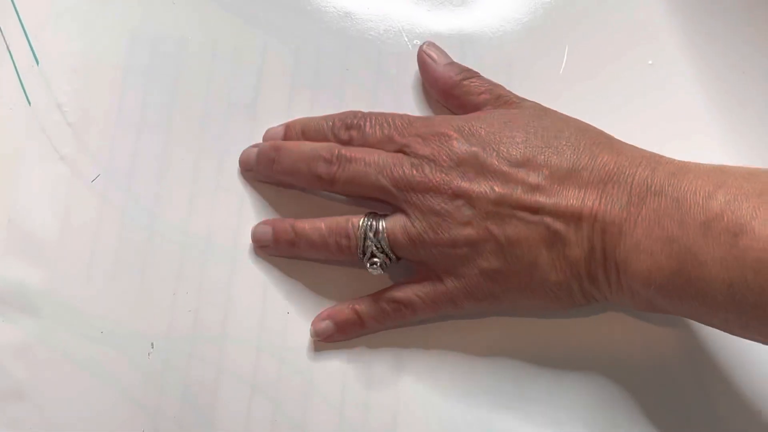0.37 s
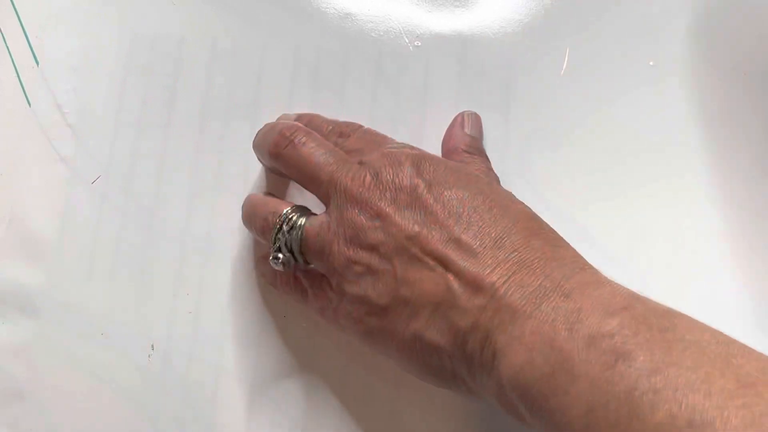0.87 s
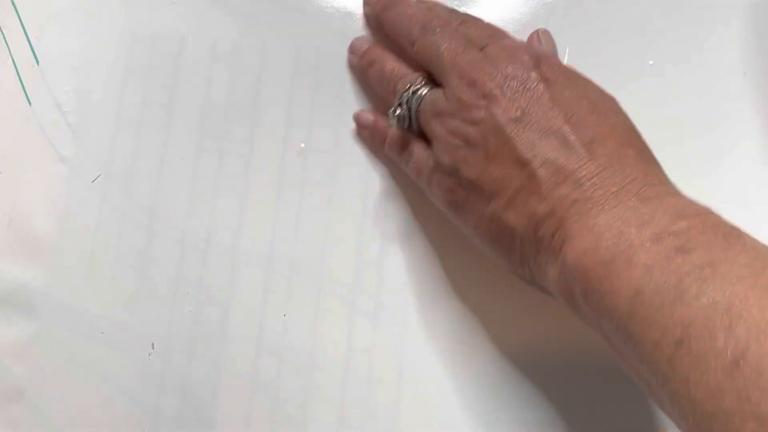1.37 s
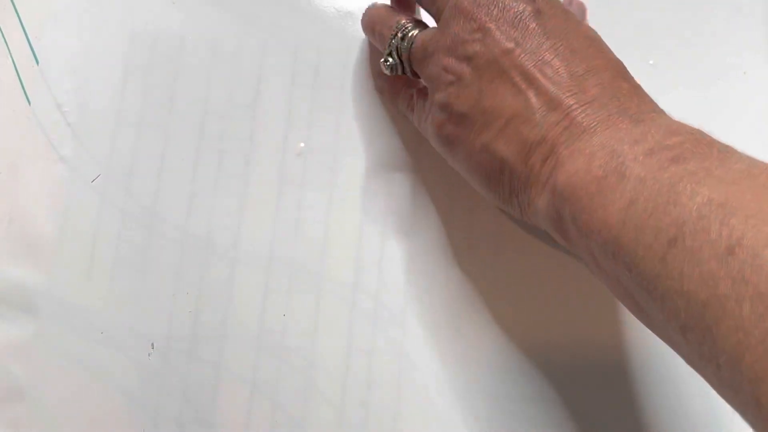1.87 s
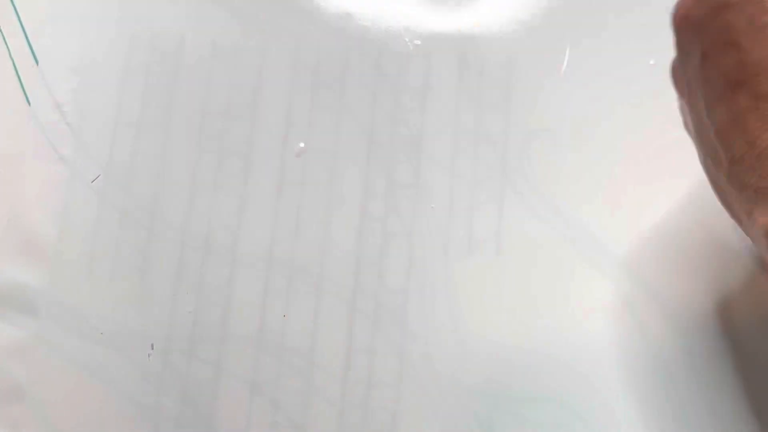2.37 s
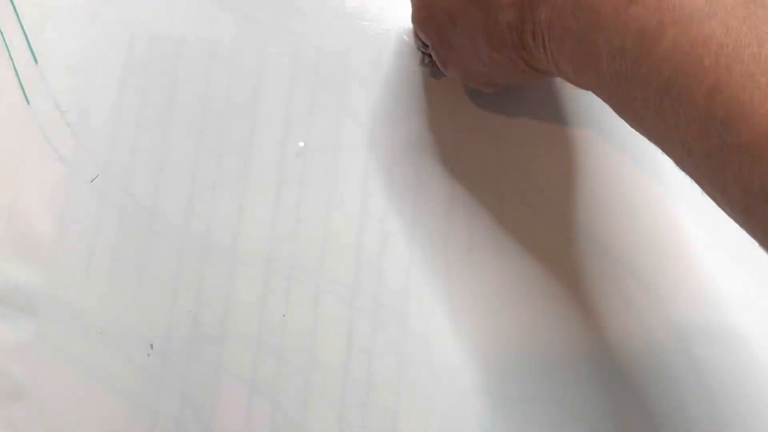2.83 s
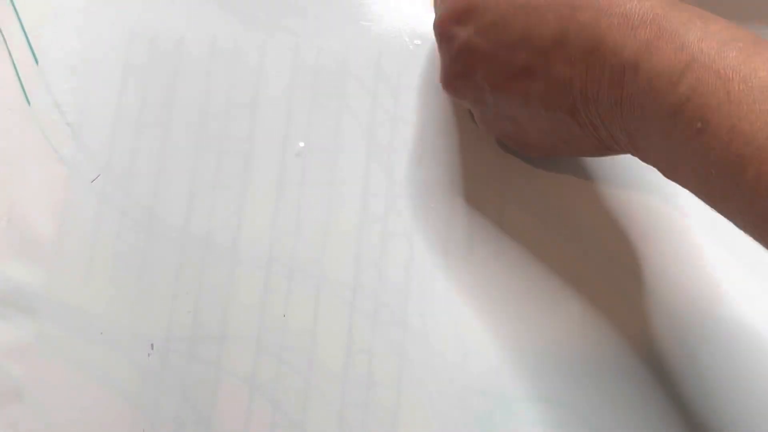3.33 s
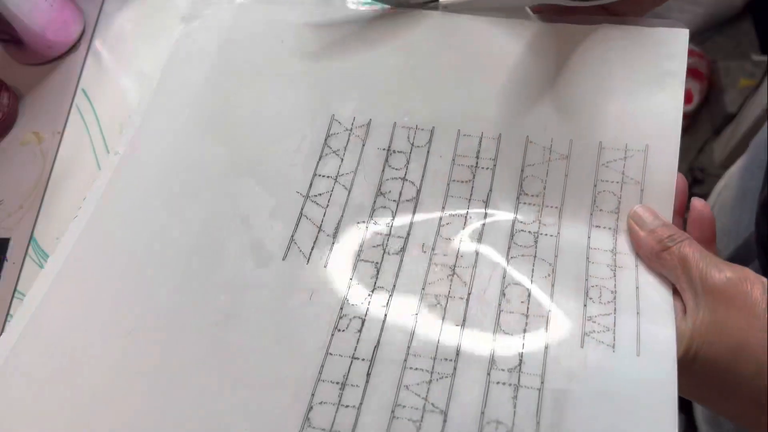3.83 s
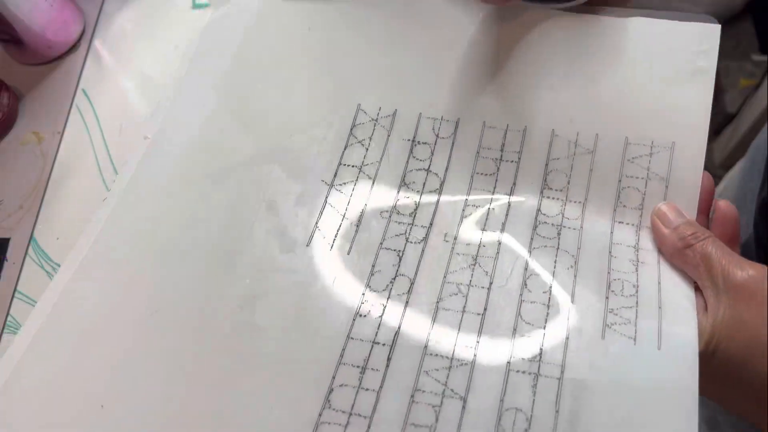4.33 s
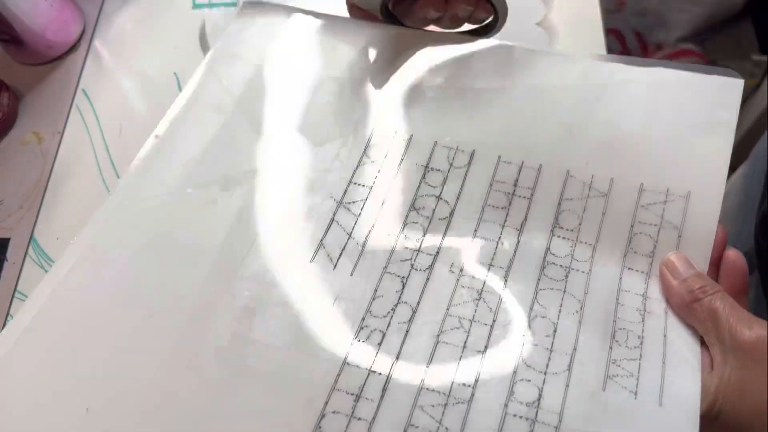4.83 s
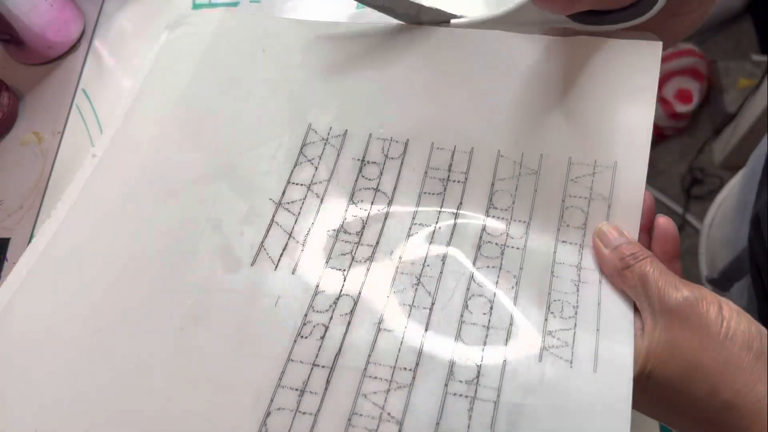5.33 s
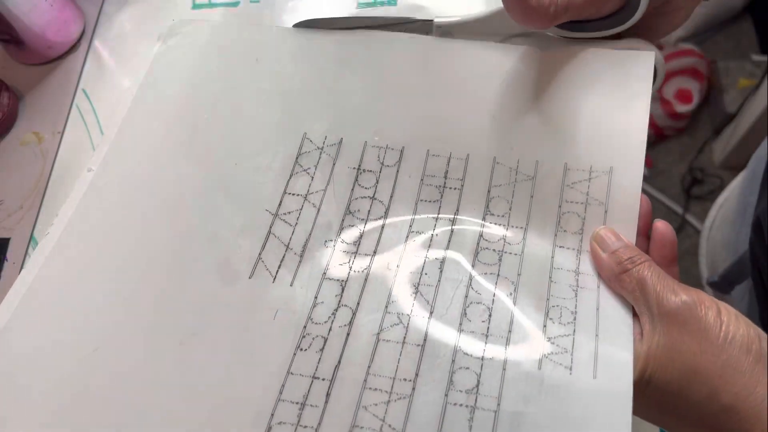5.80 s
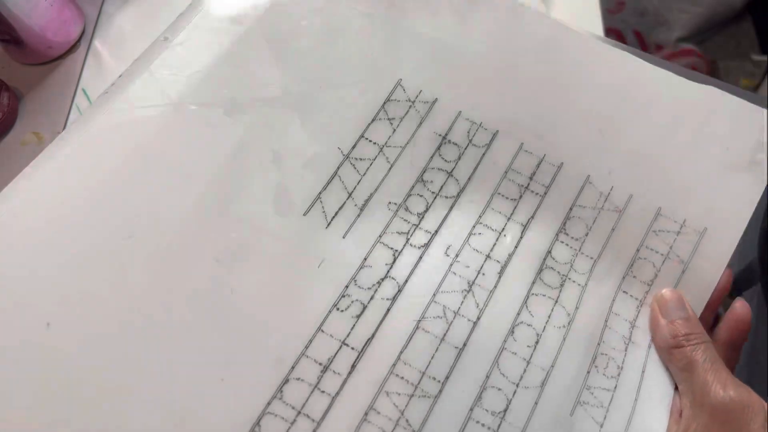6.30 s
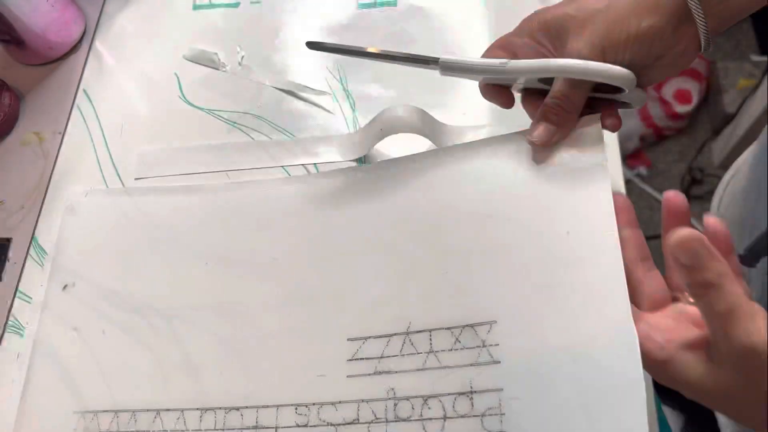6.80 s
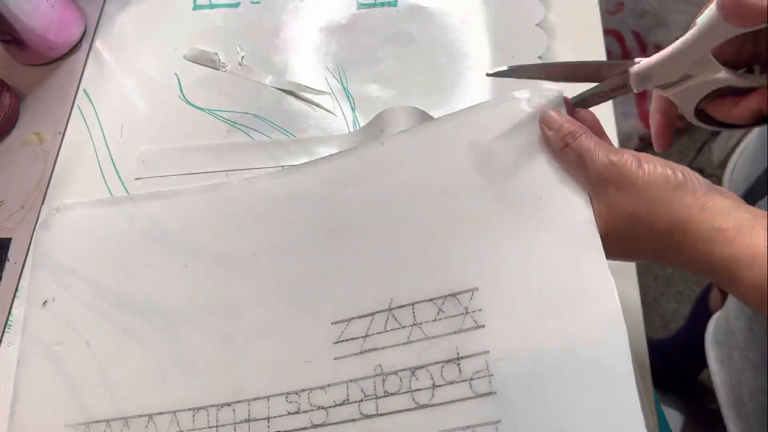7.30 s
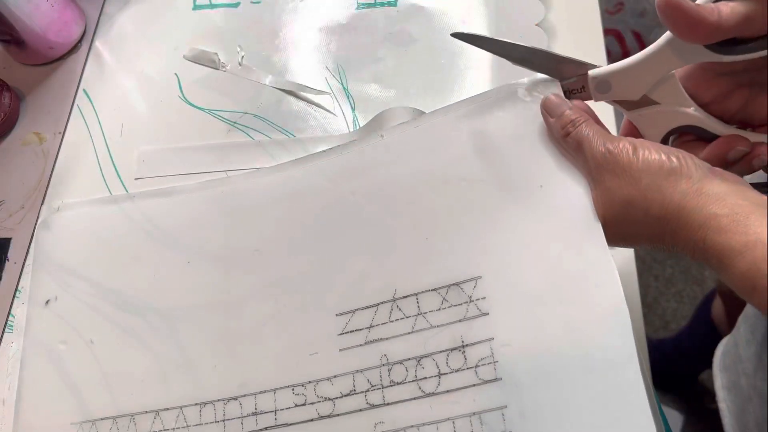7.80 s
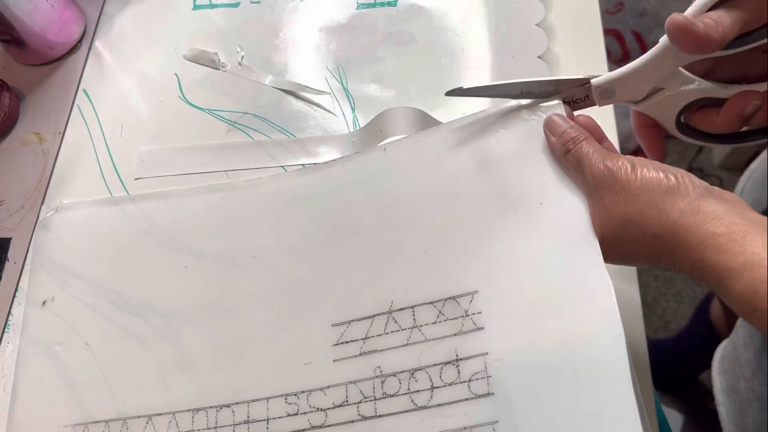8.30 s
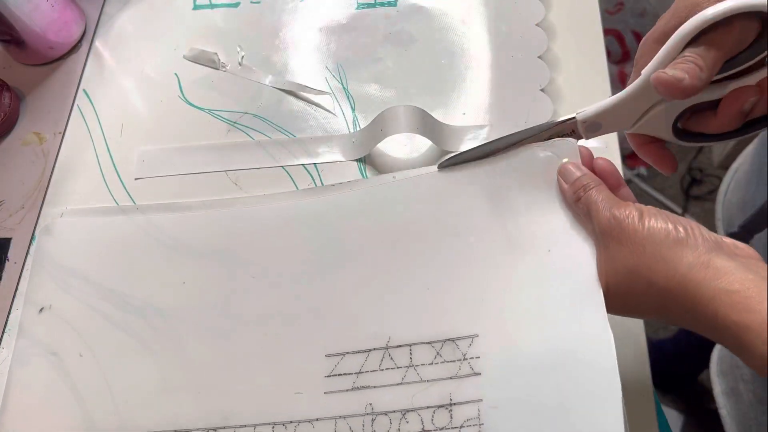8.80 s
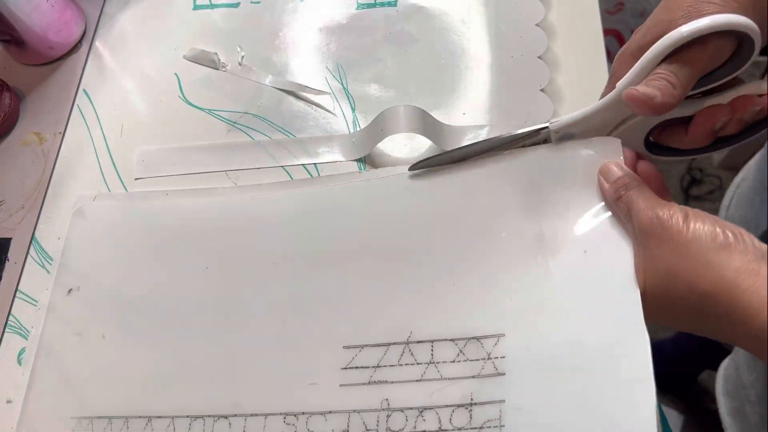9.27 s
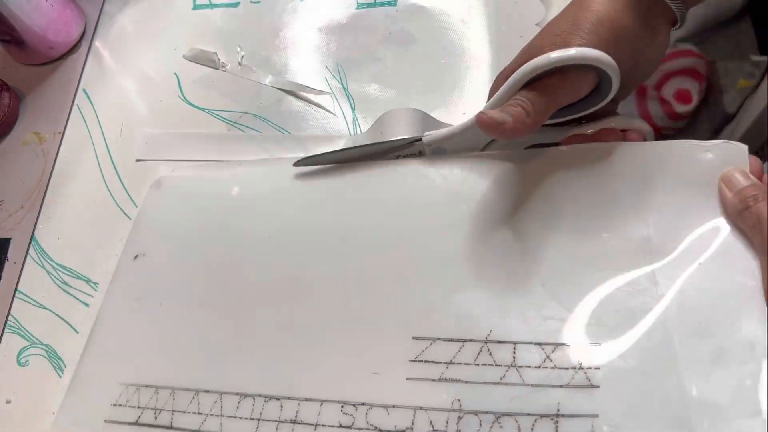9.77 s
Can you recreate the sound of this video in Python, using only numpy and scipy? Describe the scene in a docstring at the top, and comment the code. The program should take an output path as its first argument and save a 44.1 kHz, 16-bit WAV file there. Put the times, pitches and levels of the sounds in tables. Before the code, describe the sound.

In a small quiet room, a palm drags over a tabletop with a low soft rumble and one tiny squeak. A stiff plastic sheet then buckles with a loud boomy pop and a dense burst of bright crackles. Scissors chew through it in rapid dry snaps, followed by knocks, handling scrapes and light blade strokes. Close stereo microphone, short room reflections, faint hum late on.

```python
"""First a palm rubs over a table in a small quiet room: noise rings the table's low modes. A hand smooths a
thin stiff plastic sheet with hissing strokes and one squeak, then peels it up: creases flip as clicks with
booms, and flaps puff air. Scissors chew (rows of snaps, faint blade tones, dull pops) and slide along the
edge (noise mixed with uneven slips). Late on, two close tones beat as a distant hum. Sparse reflections
give the room, and two close microphone ports listen."""
import sys
import numpy as np
from scipy import signal
from scipy.fft import rfft, irfft
from scipy.io import wavfile
from scipy.ndimage import uniform_filter1d

SR = 44100
rng = np.random.default_rng(int(sys.argv[2]) if len(sys.argv) > 2 else 0)


def magnitude_from_level(level_db):
    """Linear magnitude for a level in decibels (20 dB per decade)."""
    exponent = np.asarray(level_db, float) / 20
    return 10 ** exponent


def inscribe(sig):
    """Save sig as 16-bit PCM at rate SR to the path in sys.argv[1].

    A 1-D sig is mono; a 2-D sig holds one channel per row.
    Samples are clipped to [-1, 1] before scaling.
    """
    pcm = np.round(np.clip(np.atleast_2d(sig).T, -1, 1) * 32767)
    wavfile.write(sys.argv[1], SR, pcm.astype(np.int16))


N = 436590

# room noise: (pitch [Hz], relative level [dB]); its overall rms follows
AIR_SPECTRUM = [(30, -53.5), (100, -9), (200, -24), (245, -16.5), (345, -17), (430, -26.5), (900, -36),
                (3000, -39.5), (4500, -48), (16000, -55.5)]
AIR_DB = -61.5
# how alike the room noise is at the two ports: (pitch [Hz], likeness [-1 to 1])
AIR_LIKENESS = [(60, 0.88), (290, .9), (640, 0.3), (1400, -0.28)]
# palm dragging on the table top: (time [s], level [dB])
DRAG = [(0, -51), (.45, -55.5), (.8, -51.5), (1.401, -56.5), (1.699, -53), (2.299, -61), (3.3, -62.5)]
# what the palm rings, table modes and skin whisper: (pitch [Hz], width [Hz], level [dB])
TABLE_MODES = [(90, 12, 3.5), (168, 54, -6.5), (248, 77, -12.5), (504, 130, -20), (2090, 3900, -59)]

# buckling snaps of the sheet: (time [s], knock level [dB], boom over knock [dB], crack over knock [dB])
SNAPS = [(0.057, -50, -6, 18.5), (2.2758, -27.5, 10, 8.5), (2.2946, -17, 8, -5), (2.3593, -4.5, 2.5, -7),
         (2.3771, -21.5, 9.5, -4), (2.6961, -44, -31, 7.5), (2.747, -34.5, -14.5, 2),
         (2.7915, -10.5, -22, 5), (2.9605, -26.5, -22, 1.5), (2.974, -40, -9.5, 9), (3.2151, -38, -18, 8),
         (3.2396, -11, -15, 8.5), (3.3196, -14, -51, 5.5), (3.3323, -20, -25, 7), (3.3422, -19, -22, 13.5),
         (3.4405, -12, -21.5, 1), (3.4723, -16.5, -13, 15.5), (3.4912, -12.5, -30, 14),
         (3.508, -13.5, -33, 10.5), (3.52, -17.5, -16, 16.5), (3.535, -19.5, -10.5, 13.5),
         (3.6825, -46.5, 7.5, 4.5), (3.977, -45.5, -8, -25.5), (4.081, -41, -25, -17),
         (4.799, -32.5, -13, 2.5), (5.177, -36, 1, -16.5), (5.2726, -29, -1, -14), (5.786, -16, -43, -22),
         (5.8246, -33, 0.5, -20), (6.4094, -28.5, -15, -11), (6.4199, -30.5, -4, 1), (6.581, -32, -4, -6.5),
         (6.647, -41, -18, -9.5), (6.973, -49.5, -5, 0.5), (7.0354, -29.5, -16.5, -2.5),
         (7.1399, -36, -20, -1.5), (9.7927, -41, -2.5, -0.5)]
# what the loose sheet booms with, before small random shifts: (pitch [Hz], level [dB], t60 [s])
SHEET_MODES = [(520, 6, 0.021), (600, -5, 0.045), (770, -4, 0.022), (1000, -7, 0.032), (410, -4, 0.025)]
# where the hands work the sheet: (time [s], left over right [dB])
PLACE = [(0, -3.5), (2.36, -3), (2.75, -4.5), (3.6, -5), (4.1, 0.5), (9.9, -5)]
# small dry ticks of the sheet under the fingers: (time [s], knock level [dB], crack over knock [dB])
TICKS = [(0.379, -40, 17.5), (.584, -52.5, 8), (3.281, -44, 9.5), (3.2935, -42.5, 8.5), (3.495, -18, 6),
         (6.4792, -45, 5), (8.6201, -41.5, -4.5)]
# how long the room rings: (pitch [Hz], t60 [s])
ROOM_DECAY = [(250, 0.25), (660, 0.064), (1740, 0.14), (4590, .12), (12100, 0.12)]

# short strokes of blade or skin along plastic: (start [s], length [s], hiss level [dB], flexing body level [dB])
STROKES = [(0.551, 0.059, -64.5, -83.5), (1.032, 0.062, -71, -87), (1.28, 0.18, -75.5, -101),
           (3.676, 0.061, -59.5, -53), (3.761, 0.054, -76, -60.5), (3.889, 0.033, -79, -58.5),
           (4.647, .087, -52.5, -57), (4.794, 0.077, -59.5, -58), (4.873, 0.06, -62.5, -82.5),
           (7.11, 0.03, -63.5, -77.5), (8.452, 0.025, -62, -73), (8.585, 0.04, -56.5, -64.5),
           (8.699, 0.076, -59, -74), (8.793, 0.0533, -72, -62.5), (8.853, 0.034, -57.5, -58),
           (8.948, 0.071, -56, -65), (9.047, 0.072, -63, -69.5), (9.135, 0.075, -69.5, -72.5),
           (9.237, 0.069, -56.5, -70)]
# long slides, one table each: (time [s], hiss level [dB], flexing body level [dB])
SLIDES = [
    [(2.55, -67, -79), (2.68, -64, -71), (2.77, -67, -81.5)],
    [(3.16, -70.5, -77), (3.24, -50, -54)],
    [(3.96, -99, -89), (3.99, -71, -49), (4.07, -99.5, -56.5), (4.09, -59.5, -42.5), (4.12, -68.5, -49.5),
     (4.155, -45, -24), (4.19, -49.5, -44), (4.28, -71.5, -56.5), (4.43, -59.5, -57), (4.59, -63.5, -63.5),
     (4.63, -79, -66)],
    [(5.178, -70, -42.5), (5.24, -59.5, -35), (5.256, -91, -87), (5.275, -66, -30), (5.302, -58, -35.5),
     (5.315, -97, -79), (5.39, -100, -75), (5.425, -98.5, -49.5), (5.52, -98, -74.5)],
    [(6.068, -68, -65), (6.09, -73.5, -64.5), (6.235, -71, -80.5), (6.385, -66.5, -69), (6.52, -65, -67.5),
     (6.57, -81, -78), (6.63, -60.5, -71), (6.66, -69, -69), (6.685, -57, -68.5), (6.845, -72.5, -87),
     (6.865, -59, -73.5), (6.97, -74, -81.5)],
    [(9.33, -68, -67), (9.39, -63.5, -67.5), (9.62, -56, -60), (9.66, -58, -57), (9.675, -52, -41.5),
     (9.725, -61.5, -55.5), (9.76, -94, -84), (9.795, -56.5, -40), (9.83, -59, -63.5), (9.9, -59.5, -56.5)],
]
# colour of the rubbing hiss: (pitch [Hz], relative level [dB])
HISS_SPECTRUM = [(880, -37.5), (1500, -9), (2540, -8), (4080, -5), (4780, -10.5), (7460, -18),
                 (11000, -14.5), (16000, -26.5)]
# colour of the flexing sheet's body: (pitch [Hz], relative level [dB])
BODY_SPECTRUM = [(90, -37.5), (180, -15.5), (800, 2), (1400, -2), (3200, -21), (4100, -18.5), (4800, -27),
                 (7000, -58)]
# how the blades' grip cuts or lifts the low part of the body: (time [s], gain below GRIP_HZ [dB])
GRIP = [(3.898, 6), (4.001, -18.5), (4.599, 3), (5.1, 4.5), (7.3, 11), (8.4, -9.5)]
GRIP_HZ = 900
STROKE_RISE_SHARE, SLIDE_EDGE_S = 0.34, .004
SKIN_UNTIL_S, SKIN_HZ, SKIN_DB = 3.0, 9000, 7  # while only skin rubs, the hiss is thin and bright
BOUNCE_S, BOUNCE = .0007, .4  # mean extra path by way of the table top, and its strength

# skin catches once: (time [s], level before a 2.5 dB lift [dB], pitch [Hz])
SQUEAK = [(0.856, -63, 967), (.895, -56, 946), (.925, -88, 990)]
# the held sheet flaps and pushes air: (time [s], level [dB])
FLAPS = [(2.356, -35), (2.794, -40.5), (3.237, -37), (5.192, -43), (5.229, -48), (5.787, -41.5),
         (6.416, -47.5), (6.576, -47.5)]
FLAP_RISE_S, FLAP_T60_S = 0.0047, 0.22
# brief narrow rings of a taut patch of sheet: (time [s], length [s], level [dB], pitch [Hz])
RINGS = [(3.241, 0.018, -18, 3320), (6.379, 0.014, -45.5, 3260), (6.677, 0.021, -44, 3570),
         (9.607, 0.074, -41, 6270)]
RING_WIDTH = .075  # share of the pitch to either side
# dull pops as the gripped sheet gives way: (time [s], level [dB], pitch [Hz])
POPS = [(3.288, -35.5, 3000), (3.993, -41.5, 897), (4.046, -32, 1150), (4.099, -38.5, 1193),
        (4.1063, -33.5, 1200), (4.128, -27.5, 1396), (4.145, -30, 1200), (4.16, -22.5, 1243),
        (7.157, -39.5, 1830), (9.668, -41.5, 1500)]
POP_RISE, POP_FALL = 2.1, 2.7  # swings
# quick runs of small snaps: (start [s], length [s], mean gap [s], knock level [dB], crack over knock [dB])
RUNS = [(3.447, .011, .004, -19.5, 7.5), (3.479, .05, .008, -18, 4.5), (4.178, .022, .0047, -28, -1),
        (4.2879, .031, .0048, -29.5, -4.5), (5.825, .008, 0.0039, -36, -8.5)]
UNEVEN, SCATTER_DB = .15, 3.  # furthest strays, as a share of the gap and in level
# single jerks as the blades slow down: (time [s], knock level [dB], crack over knock [dB])
NICKS = [(4.2122, -32, -4), (4.325, -27.5, 4), (4.34, -30.5, 5), (4.3535, -27.5, 2.5), (4.391, -28, 1),
         (4.4019, -27, -0.5), (4.463, -22.5, 3), (4.5429, -21.5, -1)]
NICK_GRIT, NICK_RATTLE, NICK_ROOM_DB = .7, .08, -10.5  # jerks are clean, dry clicks
BLADE_DB, BLADE_T60_S = -24, .04  # the blades ring faintly at each jerk
# distant hum: (time [s], level [dB])
HUM = [(6.601, -71.5), (7.7, -64), (9.05, -59.5), (9.9, -57.5)]
HUM_HZ, BEATS_PER_S, BEAT_NULL_S = 247, 5, 9.35  # midway between its two close tones


def evened(x):
    """Scales to rms 1."""
    return x / np.sqrt(np.mean(x ** 2) + 1e-20)


def peaked(x):
    """Scales to a highest swing of 1."""
    return x / abs(x).max()


def read(points, hz):
    """Reads a spectrum on a log-frequency axis."""
    f, value = np.transpose(points)
    return np.interp(np.log(hz + 1), np.log(f + 1), value)


def coloured(x, points):
    """Multiplies the spectrum of x by the curve of points."""
    gain = magnitude_from_level(read(points, np.fft.rfftfreq(x.shape[-1], 1 / SR)))
    return irfft(rfft(x) * gain, x.shape[-1])


def band(x, lo_hz, hi_hz):
    """Causal band-pass."""
    return signal.sosfilt(signal.butter(2, [lo_hz, hi_hz], "bandpass", fs=SR, output="sos"), x)


def add(mix, s, sound, pan_db, lag):
    """Places a sound at both ports; the left one hears it lag samples later."""
    for port, (late, db) in enumerate([(lag, pan_db / 2), (0, -pan_db / 2)]):
        part = mix[port, max(round(s * SR) + late, 0):][:len(sound)]
        part += magnitude_from_level(db) * sound[:len(part)]


def place(s):
    """Where the hands are at a time, as left over right in dB."""
    return np.interp(s, *np.transpose(PLACE))


def air():
    """Room noise with drifting patches of colour; bass alike at both ports."""
    frames, hz = N // 512 + 5, np.fft.rfftfreq(2048, 1 / SR)
    a, b, c, d, patches = rng.standard_normal((frames, 1025, 5)).T
    patches = evened(uniform_filter1d(uniform_filter1d(patches, 20, 0), 10, 1))
    same = np.clip(read(AIR_LIKENESS, hz), -1, 1)[:, None]
    left = a + 1j * b
    z = np.array([left, same * left + np.sqrt(1 - same ** 2) * (c + 1j * d)])
    z *= magnitude_from_level(read(AIR_SPECTRUM, hz)[:, None] + 1.2 * patches)
    noise = signal.istft(z, nperseg=2048, noverlap=1536)[1][:, :N]
    return magnitude_from_level(AIR_DB) * evened(noise)


def drag():
    """Random rubbing force rings the table's low modes; skin adds a faint whisper."""
    hz = np.fft.rfftfreq(N, 1 / SR)
    modes = sum(magnitude_from_level(db) / (1 + 2j * (hz - f) / width) ** 2 for f, width, db in TABLE_MODES)
    s, db = np.transpose(DRAG)
    level = magnitude_from_level(np.interp(np.arange(N) / SR, [*s, s[-1] + 0.19], [*db, -120]))
    force = rng.standard_normal(N) + 0.22 * rng.standard_normal((2, N))  # mostly shared by the ports
    return level * evened(irfft(rfft(force) * modes, N))


def snap(mix, s, db, boom_db, crack_db, pan_db, rattle, grit):
    """A crease flips: a click whose low part arrives late, as bending waves spread by pitch; then the boom."""
    t, hz = np.arange(4096) / SR, np.fft.rfftfreq(4096, 1 / SR)
    chance = rng.standard_normal((3, len(t)))
    spread = np.exp(-2j * np.pi * (0.085 * np.sqrt(hz) + hz * 0.0005))  # spread delay falls as 1 / sqrt(Hz)
    push = chance[:2] * (np.exp(-t / 0.00061) + rattle * np.exp(-t / 0.0091))
    crack, knock = irfft(rfft(grit * push + 3 * (t == 0)) * spread, len(t))
    # tight creases crack more and knock higher
    knock_hz = 1500 * 2 ** np.clip((crack_db + 16.5) / 18, -.3, 1.1)
    crack = band(crack, 3300, 13000)
    knock = band(band(knock, 0.37 * knock_hz, 2.1 * knock_hz), 200, 2.9 * knock_hz)
    glide = t + 0.00072 * (1 - np.exp(-t / 0.0017))  # the phase runs fast at first: pitch falls
    boom = np.zeros(len(t))
    for (f, level, t60), a, b in zip(SHEET_MODES, chance[2], chance[2, ::-1]):
        tone = np.sin(2 * np.pi * f * (1 + .02 * np.tanh(b)) * glide)
        boom += magnitude_from_level(level + 1.5 * np.tanh(a) - 60 * t / t60) * tone
    boom = np.roll(boom * (1 - np.exp(-t / 0.0011)), 60)  # starts 60 samples later
    lag = rng.integers(1, 5)
    click = peaked(knock) - magnitude_from_level(crack_db) * peaked(crack)
    add(mix, s - .0012, magnitude_from_level(db) * click, pan_db, lag)
    add(mix, s - .0012, magnitude_from_level(db + boom_db) * peaked(boom), 0, lag)


def room(x):
    """Three sets of sparse reflections take turns, each band dying at its own speed."""
    out, turn = np.zeros((2, N)), np.arange(N) * 17.3 / SR
    for k in range(3):
        taps = np.zeros((2, 16000))
        at = np.arange(90, 15980, 12) + rng.integers(0, 12, (2, 1325))
        np.put_along_axis(taps, at, rng.choice([-1., 1.], at.shape), 1)
        hz, t, z = signal.stft(taps, SR, nperseg=256)
        same = np.clip(0.75 / (1 + (hz / 900) ** 2), 0, 1)[:, None]  # long waves agree at both ports
        z[1] = same * z[0] + np.sqrt(1 - same ** 2) * z[1]
        fade = magnitude_from_level(-60 * t / read(ROOM_DECAY, hz)[:, None])
        tail = signal.istft(z * fade, SR, nperseg=256)[1]
        share = np.sqrt(2 / 3) * np.cos(np.pi * (turn - k / 3))
        out += signal.oaconvolve(x * share, tail / np.linalg.norm(tail[0]), axes=1)[:, :N]
    return out


def swells():
    """Levels of hiss and body over time: short strokes share one arch, slides follow their curves."""
    t, level = np.arange(N) / SR, np.full((2, N), 1e-9)
    for start, length, hiss_db, body_db in STROKES:
        corners = start + length * np.array([0, STROKE_RISE_SHARE, 1])
        turn = np.interp(t, corners, [0, np.pi / 2, np.pi])
        span = (t > start) & (t < start + length)
        level[:, span] += np.outer(magnitude_from_level([hiss_db, body_db]), np.sin(turn[span]))
    for slide in SLIDES:
        s, *dbs = np.transpose(slide)
        first, last = s[0] - SLIDE_EDGE_S, s[-1] + SLIDE_EDGE_S
        span = (t > first) & (t < last)
        edge = np.interp(t[span], [first, s[0], s[-1], last], [0, 1, 1, 0])
        level[:, span] += [edge * magnitude_from_level(np.interp(t[span], s, db)) for db in dbs]
    return level


def shifting(x, patchy_db):
    """The contact wanders over the sheet: patches of colour come and go, and the table bounce combs the sound."""
    hz, t, z = signal.stft(x, SR, nperseg=256)
    detour = BOUNCE_S * (1 + .2 * evened(uniform_filter1d(rng.standard_normal(len(t)), 120)))
    z = z * (1 + BOUNCE * np.exp(-2j * np.pi * np.outer(hz, detour)))
    patches = uniform_filter1d(uniform_filter1d(rng.standard_normal(z.shape[1:]), 6, 0), 14, 1)
    return signal.istft(z * magnitude_from_level(patchy_db * evened(patches)), nperseg=256)[1][:, :N]


def strokes():
    """Stick-slip friction: noise plus uneven slips, heard as hiss and through the flexing sheet."""
    high, low = swells()
    t = np.arange(N) / SR
    grainy = np.clip((20 * np.log10(low) + 58) / 40, .2, .7)  # strong flexing comes in distinct slips
    smooth, draw, size = rng.standard_normal((2, 2, N)), rng.random(N), rng.exponential(1, N)
    # about 500 slips a second
    slips = (draw < 500 / SR) * magnitude_from_level(3.5 * np.minimum(size, 3)) * np.sign(smooth[0, 0])
    # reversed copies serve as further noise
    hiss_noise = evened(coloured(smooth[0] + 0.32 * smooth[0, ::-1], HISS_SPECTRUM))
    body_noise = evened(coloured(smooth[1] + 0.3 * smooth[1, ::-1], BODY_SPECTRUM))
    hiss_slips = evened(coloured(slips, HISS_SPECTRUM))
    body_slips = evened(coloured(slips, BODY_SPECTRUM))
    hiss = high * (1 - .5 * grainy) * hiss_noise + high * .5 * grainy * hiss_slips
    body = low * (1 - grainy) * body_noise + low * grainy * body_slips
    thin = signal.sosfilt(signal.butter(1, SKIN_HZ, "highpass", fs=SR, output="sos"), hiss)
    hiss = np.where(t < SKIN_UNTIL_S, magnitude_from_level(SKIN_DB) * thin, hiss)
    deep = signal.sosfiltfilt(signal.butter(2, GRIP_HZ, fs=SR, output="sos"), body)
    body = body + deep * (magnitude_from_level(np.interp(t, *np.transpose(GRIP))) - 1)
    return shifting(hiss * magnitude_from_level([[-1.5], [1.5]]) + body, patchy_db=2.2)  # hiss leans right


def squeak():
    """Skin sticks and slips at a shaky pitch: a short rough tone with its octave."""
    s, db, hz = np.transpose(SQUEAK)
    t = np.arange(s[0], s[-1], 1 / SR)
    wobble = 1 + 0.76 * uniform_filter1d(rng.standard_normal(len(t)), 60)
    phase = 2 * np.pi * np.cumsum(np.interp(t, s, hz) * wobble) / SR
    tone = np.sin(phase) + 0.28 * np.sin(2 * phase)
    return s[0], magnitude_from_level(np.interp(t, s, db) + 2.5) * tone * np.hanning(len(t)) ** 0.5


def flap(db):
    """The sheet pushes air: a soft low puff of band-passed noise."""
    t = np.arange(6000) / SR
    puff = band(band(rng.standard_normal(len(t)), 133, 322.6), 133, 322.6)
    return magnitude_from_level(db) * peaked(puff * (1 - np.exp(-t / FLAP_RISE_S)) * magnitude_from_level(-60 * t / FLAP_T60_S))


def ring(length, db, hz):
    """A taut patch rings: a narrow band of noise that swells fast and dies away."""
    t = np.arange(0, length, 1 / SR)
    edges = hz * (1 - RING_WIDTH), hz * (1 + RING_WIDTH)
    noise = band(band(rng.standard_normal(len(t)), *edges), *edges)
    return magnitude_from_level(db) * peaked(noise * np.sin(np.pi * (t / length) ** 0.37))


def pop(s, db, hz):
    """The sheet gives way: a tone swells over a swing or two, sags in pitch and dies, roughened a little."""
    swings = np.arange(-3 * POP_RISE, 6 * POP_FALL, hz / SR)
    shape = np.where(swings < 0, np.exp(-(swings / POP_RISE) ** 2), np.exp(-swings / POP_FALL))
    rough = band(rng.standard_normal(len(swings)), .6 * hz, 2 * hz)
    tone = np.cos(2 * np.pi * swings * (1 - 0.013 * swings)) + 0.18 * evened(rough)
    return s - 3 * POP_RISE / hz, magnitude_from_level(db) * peaked(shape * tone)


def run(start, length, gap, db, crack_db):
    """A row of small snaps, one about every gap seconds, at an uneven pace."""
    late, size = rng.uniform(-1, 1, (20, 2)).T
    s = gap * (np.arange(20) + UNEVEN * late * (np.arange(20) > 0))
    return [(start + a, db + SCATTER_DB * b, crack_db) for a, b in zip(s, size) if a < length]


def blade(db):
    """A blade rings at a jerk: a short damped tone of varying pitch."""
    t = np.arange(3000) / SR
    hz = rng.uniform(3199.5, 4252.5)
    return magnitude_from_level(db + BLADE_DB - 60 * t / BLADE_T60_S) * np.sin(2 * np.pi * hz * t)


def hum():
    """Two close wavering tones beat against each other."""
    s, db = np.transpose(HUM)
    t = np.arange(N) / SR
    level = magnitude_from_level(np.interp(t, [s[0] - .3, *s], [-110, *db])) * np.sqrt(2)
    waver = evened(uniform_filter1d(rng.standard_normal(N), 6000))
    beats = np.sin(np.pi * BEATS_PER_S * (t - BEAT_NULL_S))  # equals a pair BEATS_PER_S apart
    return level * beats * np.sin(2 * np.pi * np.cumsum(HUM_HZ + 0.79 * waver) / SR)


def scene():
    """Sheet sounds with their reflections over table rumble, hum and room noise."""
    snaps, nicks, rubs = np.zeros((2, N)), np.zeros((2, N)), strokes()
    floor = air() + drag() + hum()
    for row in SNAPS:
        pan_db = place(row[0]) + rng.uniform(-6, 4)  # each big snap strays around the hands
        snap(snaps, *row, pan_db, rattle=0.21, grit=1.4)
    for s, db, crack_db in TICKS:
        snap(nicks, s, db, -23.5, crack_db, place(s), rattle=NICK_RATTLE, grit=NICK_GRIT)
    add(rubs, *squeak(), 0, 3)
    for s, db in FLAPS:
        add(rubs, s, flap(db), 0, 0)
    for s, *row in RINGS:
        add(rubs, s, ring(*row), -3, 2)
    for row in POPS:
        add(nicks, *pop(*row), place(row[0]), 2)
    for s, db, crack_db in NICKS + sum((run(*row) for row in RUNS), []):
        snap(nicks, s, db, -20.5, crack_db, place(s), rattle=NICK_RATTLE, grit=NICK_GRIT)
        add(nicks, s, blade(db + min(crack_db, 0)), 0, 2)
    wet = room(magnitude_from_level(-7.5) * snaps + magnitude_from_level(NICK_ROOM_DB) * nicks + magnitude_from_level(-8.0) * rubs)
    return snaps + nicks + rubs + wet + floor


def low_pass(x):
    """Removes everything above the highest recorded frequency."""
    return signal.sosfilt(signal.butter(12, 17000, fs=SR, output="sos"), x)


def record(dry):
    """Gain control follows the lagging mean power and ducks after loud bursts; then peaks round off."""
    # the microphone drops deep bass
    dry = signal.sosfilt(signal.butter(2, 45, "highpass", fs=SR, output="sos"), dry)
    keep = np.exp(-1 / (0.054 * SR))  # 54 ms smoothing, applied twice
    power = (dry ** 2).mean(0)
    for _ in range(2):
        power = signal.lfilter([1 - keep], [1, -keep], power)
    over_db = np.maximum(10 * np.log10(power + 1e-12) + 37, 0)
    ducked = dry / magnitude_from_level(.16 * over_db)  # dB of gain lost per dB over the threshold
    return low_pass(np.tanh(ducked))


dry = scene()
out = record(dry)
inscribe(out)
```